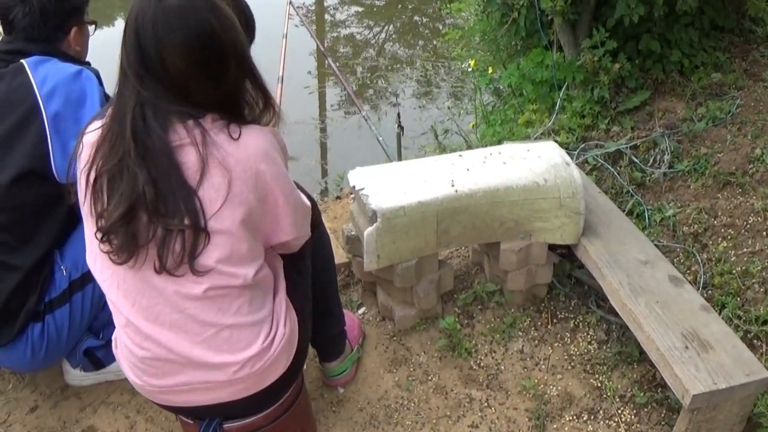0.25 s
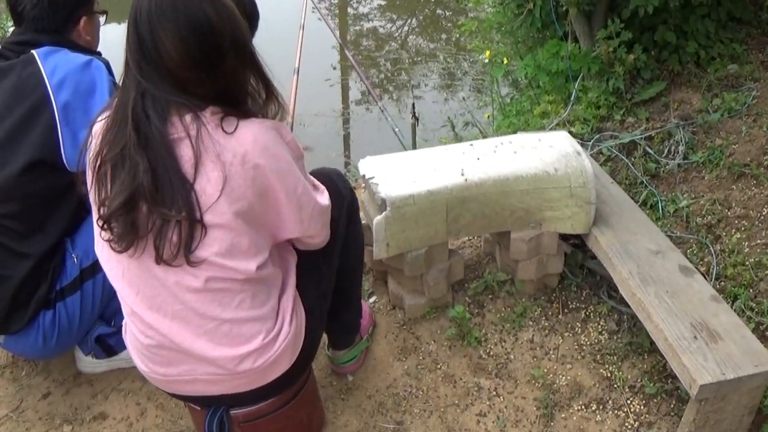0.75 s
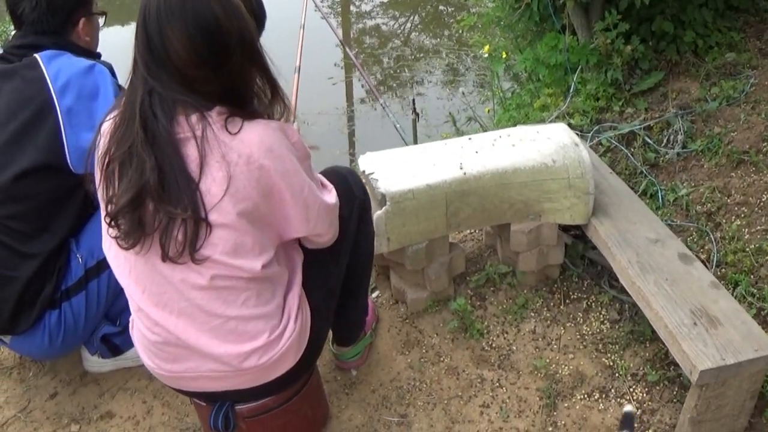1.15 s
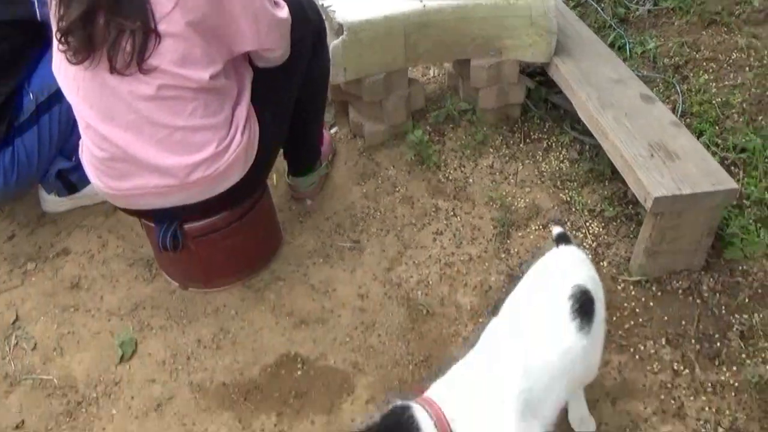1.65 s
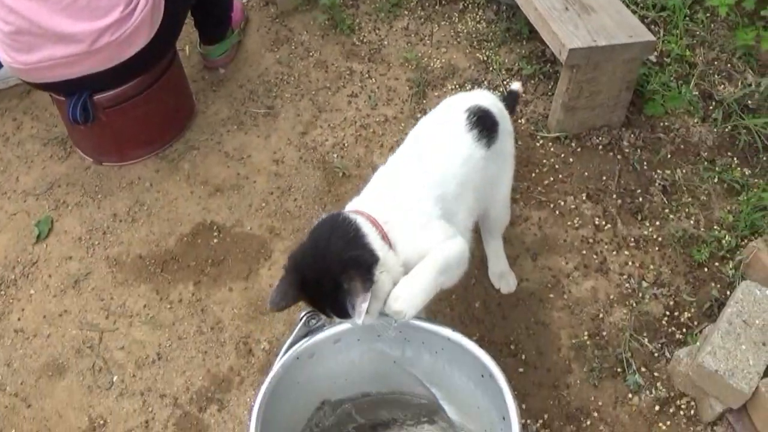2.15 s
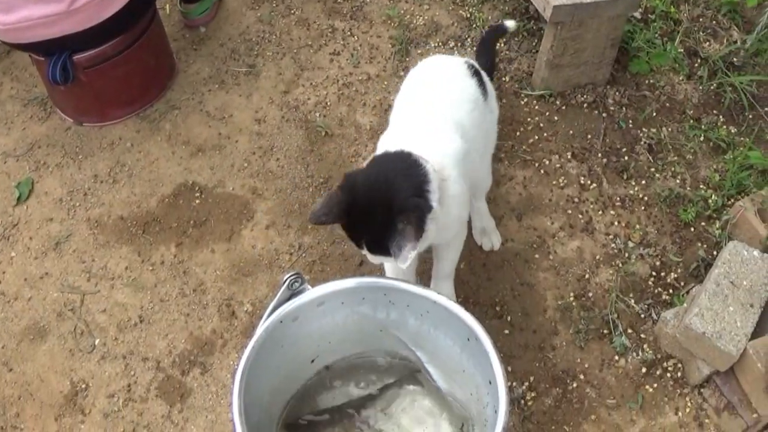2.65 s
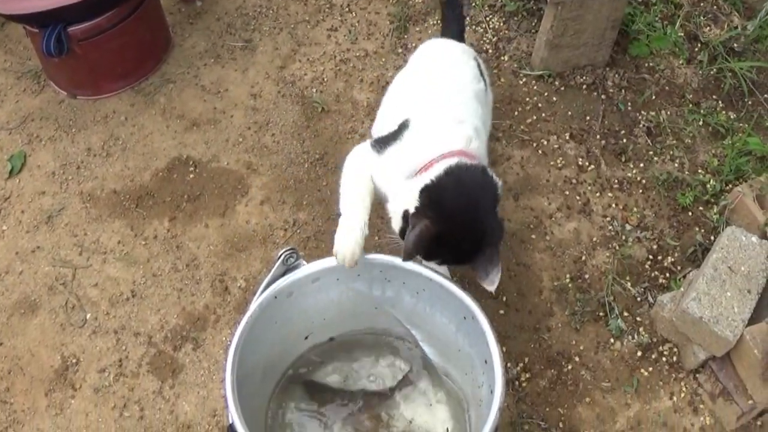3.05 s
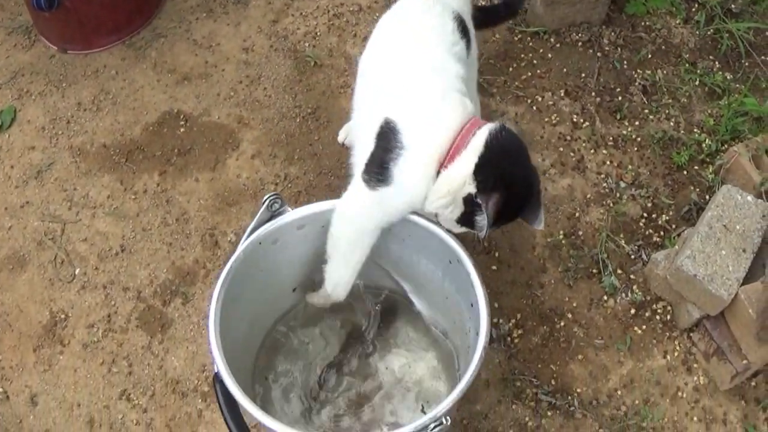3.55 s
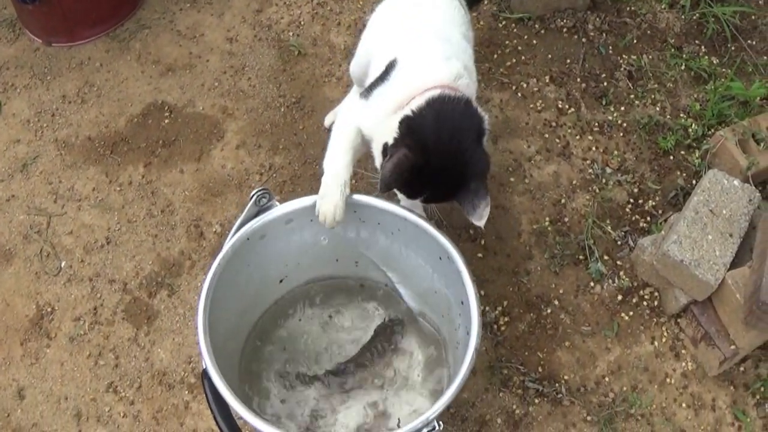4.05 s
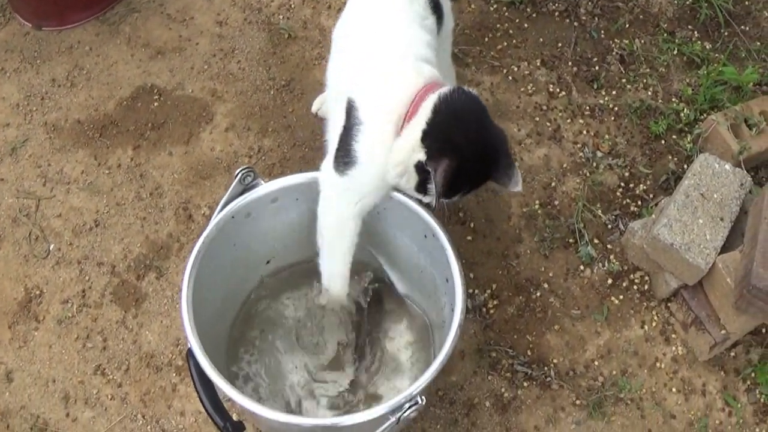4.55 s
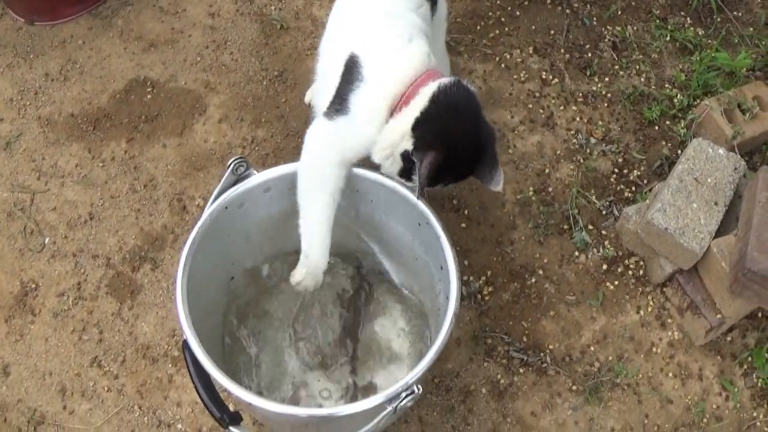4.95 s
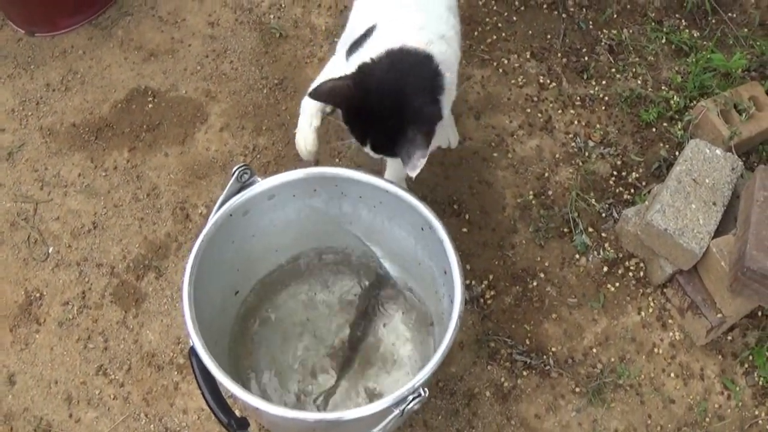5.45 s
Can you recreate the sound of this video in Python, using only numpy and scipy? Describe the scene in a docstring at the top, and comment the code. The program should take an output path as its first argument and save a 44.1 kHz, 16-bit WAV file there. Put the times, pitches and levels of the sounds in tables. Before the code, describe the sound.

Quiet country air with a faint distant drone and fine, fast insect-like ticking runs throughout, wide and soft. Faint gliding bird whistles come at 0.1, 0.4 and 0.95 s. Close up, slightly right at first, sharp drops snap in a metal bucket from 0.1 s; short splashes and fizz follow at 0.7-0.9 s. From 1.2 to 1.7 s the water churns harder, with gulping bubbles, spray and a wet metallic knock at 1.4 s. High wavering pips around 1.5-2.1 s fade away. It is nearly still until two soft piping bird notes at 3.2 and 3.4 s. Paw swishes lead to a knock and splashing at 3.5-3.8 s, then settling fizz and a few drips. A soft swish at 4.6 s precedes a very loud, sharp tick at 4.83 s and a dense splash with bubbles and metal ring around 4.95-5.15 s. Scattered drops die away by 5.7 s, with short, tight bucket echoes.

```python
"""Quiet country air with a faint far drone and fine, fast ticking opens the scene, with faint bird whistles.
A cat paws at a fish in a metal bucket of shallow water: drops, splashes, gulping bubbles, knocks, high pips.
Shaped noise makes air, spray, swishes and wash; short gliding tones make bubbles, birds and pips.
Drops mix a noisy crack with a ping. Resonances make the metal ring, and echoes close the bucket round it."""
import sys
import numpy as np
from scipy import signal
from scipy.io import wavfile

SR = 44100
rng = np.random.default_rng(int(sys.argv[2]) if len(sys.argv) > 2 else 0)


def to_wav(sig):
    """Store sig (one row per channel, or 1-D mono) as 16-bit WAV at the path in sys.argv[1].

    Samples outside -1..1 are clipped; the rate is SR.
    """
    pcm = np.clip(np.atleast_2d(sig), -1, 1) * 32767
    pcm = np.round(pcm).astype(np.int16)
    wavfile.write(sys.argv[1], SR, pcm.T)  # frames by channels


N = 251811
TIME = np.arange(N) / SR
AGE = TIME[:SR // 4]   # seconds since an event began

# Colour of the outdoor air. Each row: pitch in Hz, relative level in dB per Hz.
AIR_COLOUR = [(30, -15), (200, -6), (800, -0.5), (1450, -4), (4200, -10), (5500, -13), (10000, -14),
              (16000, -24.5)]
# A distant drone. Each row: centre in Hz, width in Hz, level in dB.
DRONES = [(464.5, 25.6, -67.5)]
# How alike the air is in the two ears. Each row: pitch in Hz, likeness from 0 to 1.
EAR_LIKENESS = [(200, 0.98), (1300, 0.47), (4000, 0.28), (10000, 1)]
# Bouts of stirring in the bucket. Each row: start in seconds, end in seconds, slosh level in dB, fizz level in dB.
STIRRING_BOUTS = [(0.68, 0.93, -59, -54.5), (1.23, 1.374, -57, -53), (1.421, 1.682, -50, -52),
                  (3.55, 3.792, -48.5, -49.5), (4.931, 5.137, -47.5, -48.5), (5.403, 5.471, -55, -66)]
# Blows on the bucket wall. Each row: time in seconds, level in dB, pitch the contact excites most in Hz.
WALL_KNOCKS = [(1.432, -28.5, 6730), (3.4878, -24.5, 5700), (4.951, -29.5, 4400)]
# Pitches at which the bucket wall rings, in close clusters. Each entry: pitch in Hz.
WALL_MODES = [1127, 1238, 1610, 2290, 3500, 4250, 4430, 4670, 4760, 4660, 5110, 5820, 6116, 6250, 6680,
              7200]
# Bird whistles. Each row: start in seconds, length in seconds, start pitch in Hz, end pitch in Hz, level in dB.
BIRD_WHISTLES = [(0.065, 0.055, 1860, 2360, -54), (0.365, 0.11, 2980, 2110, -53),
                 (0.949, 0.125, 3060, 2090, -56)]
# The loudest drops and sharp ticks. Each row: time in seconds, level in dB, centre in Hz,
# time to die away by 60 dB in seconds.
LOUD_DROPS = [(0.1142, -20.5, 7360, 0.013), (0.13, -31.5, 1920, 0.0043), (0.425, -35.5, 7500, 0.033),
              (0.5305, -26.5, 7200, 0.016), (0.555, -29, 4860, 0.024), (0.6265, -15.5, 8760, 0.003),
              (0.6595, -22, 11800, 0.0048), (0.7668, -26.5, 8640, 0.0089), (0.789, -32, 4700, 0.027),
              (0.826, -26.5, 7600, 0.003), (0.894, -23, 1030, 0.023), (1.1345, -21.5, 9900, 0.023),
              (1.148, -25, 1590, 0.015), (1.2742, -34, 9500, 0.0015), (1.291, -23.5, 4970, 0.037),
              (1.2965, -23.5, 6740, 0.007), (1.317, -29, 10800, 0.009), (1.3668, -32, 3500, 0.017),
              (1.4076, -25.5, 6260, .006), (1.4232, -26, 5000, 0.0054), (1.523, -21.5, 3960, 0.0086),
              (1.56, -21.5, 4100, 0.015), (1.6805, -24.5, 7640, 0.024), (1.7884, -26, 7300, 0.014),
              (1.795, -24, 9350, 0.015), (2.6664, -35, 9290, 0.0052), (3.0852, -40, 9300, 0.092),
              (4.057, -28, 6060, 0.0085), (4.3298, -32, 12300, 0.0046), (4.376, -26, 11100, 0.0057),
              (4.578, -32, 2520, 0.013), (4.7681, -23, 8500, 0.021), (4.813, -26.5, 3040, 0.014),
              (4.823, -24, 4360, 0.019), (4.8274, -5.5, 5940, 0.0023), (4.829, -17.5, 9500, 0.0087),
              (4.9207, -23, 9800, 0.014), (5.0845, -23.5, 10970, 0.0061), (5.1485, -24, 5000, 0.0057),
              (5.303, -30.5, 7400, 0.0063), (5.3542, -23.5, 6640, 0.004), (5.684, -39, 7400, 0.049)]
# Big pockets of trapped air. Each row: time in seconds, level in dB, starting pitch in Hz,
# starting rise in e-folds per second (a minus sign means falling).
BIG_BUBBLES = [(0.6078, -32.5, 2370, -20), (0.959, -25, 1484, 9.5), (1.345, -31.5, 2180, 12),
               (1.416, -35.5, 1280, 19.5), (1.429, -23, 2870, 25), (1.447, -34, 2290, -19),
               (1.459, -43, 1050, 16), (1.4966, -25, 1316, 30), (1.549, -38, 514, 11),
               (1.59, -29, 1280, 22.5), (1.683, -32.5, 1049, 13.5), (3.592, -37, 3370, 18),
               (3.709, -32, 2840, 18), (3.759, -40.5, 1200, 7), (3.796, -36, 2190, 12),
               (3.799, -36, 1014, 13), (4.3079, -39.5, 1587, -8), (4.334, -48, 1530, 10),
               (4.797, -45.5, 704, 3), (4.927, -33, 927, 6), (4.952, -33, 1480, 8), (4.977, -26, 3870, 10),
               (5.116, -32.5, 1756, 5), (5.1365, -24.5, 3370, -20), (5.16, -33.5, 1380, 25),
               (5.178, -37, 2440, -13), (5.261, -35.5, 1826, 2)]
# Sheets of water thrown up. Each row: time in seconds, level in dB before depth acts,
# depth of the stroke from 0 to 1, time to die away by 60 dB in seconds.
WATER_SHEETS = [(0.698, -53.5, 1, 0.08), (0.869, -46, 1, 0.084), (0.883, -33.5, 0.96, 0.021),
                (0.903, -30.5, 0.95, 0.012), (1.428, -23.5, 0, 0.028), (1.679, -22.5, 0.73, 0.014),
                (3.465, -28.5, 0, 0.062), (3.486, -30.5, 0.61, 0.15), (3.5768, -28.5, 0, 0.11),
                (3.646, -27, 0, 0.08), (3.678, -37, 0.2, 0.11), (3.704, -38, 0.81, 0.08),
                (3.742, -22, 0.1, 0.019), (4.857, -30.5, 0.26, 0.088), (4.9267, -32.5, 0.93, 0.028),
                (4.938, -25, 0.81, 0.047), (4.952, -24.5, 0.77, 0.033), (4.978, -39, 0.85, 0.097),
                (5.006, -44, 1, 0.04), (5.128, -33.5, 0.63, 0.09)]
# Soft swishes of the paw. Each row: middle in seconds, level in dB, half length in seconds.
PAW_SWISHES = [(1.345, -46, 0.015), (3.33, -55, .03), (3.367, -43, 0.013), (3.461, -47, 0.056),
               (4.626, -53, 0.12), (4.781, -46.5, 0.018)]
# A run of high pips. Each entry: time in seconds.
PIP_TIMES = [1.481, 1.6184, 1.712, 1.729, 1.774, 1.8176, 1.875, 1.8996, 1.925, 1.948, 1.969, 2.101]
# A lower bird's piping notes. Each row: start in seconds, held pitch in Hz, level in dB.
PIPED_NOTES = [(3.21, 1330, -49.5), (3.393, 1550, -51.5)]

AIR_DB = -58.5
BUILD_S, SLOSH_SETTLE_S, FIZZ_SETTLE_S = .17, .11, .34   # foam outlasts the waves
SLOSH_REST_DB, FIZZ_REST_DB = -70, -65.5   # level between bouts
STRAY_DB, STRAY_SPREAD_DB = 9.5, 12   # the smallest stray drop over the fizz; how much more the biggest has
STRAY_LOW_HZ, STRAY_HIGH_HZ, STRAY_T60_S = 2950, 11300, 0.005
SPRAY_HZ, SPRAY_DB_PER_DEPTH = 5000, 2.5   # a deep stroke throws a little more spray
SLAP_DB, SLAP_DB_PER_DEPTH = -15, 17.5   # and slaps much harder
PLUNGE_DB, PLUNGE_DB_PER_CUBED_DEPTH = -29.5, 39.5   # the cavity is strong only in the deepest
PIP_DB, PIP_FADE_DB_PER_S = -18, 50.5   # the second is loudest; loss with time away from it
CUTOFF_HZ = 16000


def from_db(db):
    """Turn decibels into a plain multiplier."""
    return 10 ** (np.asarray(db) / 20)


def rms_one(x):
    """Scale a sound to an average strength (rms) of 1."""
    return x / np.sqrt(np.mean(x ** 2) + 1e-20)


def at_hz(points, hz):
    """Read a spectrum on a log-frequency axis."""
    table = np.array(points)
    return np.interp(np.log(hz), np.log(table[:, 0]), table[:, 1])


def add(out, s, sound):
    """Mix a sound in at time s."""
    start = max(int(s * SR), 0)
    out[..., start:start + sound.shape[-1]] += sound[..., :max(N - start, 0)]


def band(x, low_hz, high_hz):
    """Keep a band of pitches, with 12 dB per octave skirts."""
    edges = [low_hz, min(high_hz, .45 * SR)]
    return signal.sosfilt(signal.butter(2, edges, "band", fs=SR, output="sos"), x)


def resonate(x, hz, width_hz):
    """One resonance, gain about 1 on top."""
    r = np.exp(-np.pi * width_hz / SR)
    top = np.array([1, 0, -1]) * (1 - r * r) / 2
    return signal.lfilter(top, [1, -2 * r * np.cos(2 * np.pi * hz / SR), r * r], x)


def tone(pitch):
    """A sine that follows a moving pitch in Hz."""
    return np.sin(2 * np.pi * np.cumsum(pitch) / SR)


def dying(t60, attack):
    """Envelope of a blow: quick rise, then a steady fall of 60 dB in t60 seconds."""
    return (1 - np.exp(-AGE / attack)) * np.exp(-np.log(1000) * AGE / t60)


def shaped(x, envelope):
    """Lay an envelope on a sound, which takes on the envelope's energy."""
    return rms_one(x * envelope) * np.sqrt(np.mean(envelope ** 2))


def drift(rate, size=N):
    """Random wander with spread near 1, through rate new values a second."""
    return np.interp(TIME[:size] * rate, np.arange(N // 8), rng.standard_normal(N // 8))


def banded_noise(spectrum, patchy_db, patchy_rate):
    """Half-octave bands of stereo noise, each flickering by itself; rms 1."""
    out, edges = 0, 22 * 2 ** np.arange(0, 10, .5)
    white = rng.standard_normal((2, 2, N))
    for k, (low, high) in enumerate(zip(edges, edges[1:])):
        hz = np.sqrt(low * high)
        if hz < spectrum[0][0]:
            continue
        mid, side = band(white[k % 2], low, high)
        alike = np.clip(at_hz(EAR_LIKENESS, hz), 0, 1)
        gain = from_db(at_hz(spectrum, hz) + patchy_db * drift(patchy_rate))
        out = out + gain * (np.sqrt(1 + alike) * mid + np.sqrt(1 - alike) * side * [[1], [-1]])
    return rms_one(out)


def country():
    """Still outdoor air is soft noise; a far drone is noise through a narrow resonance."""
    drone = 0
    for hz, width, db in DRONES:
        drone = drone + from_db(db) * rms_one(resonate(rng.standard_normal(N), hz, width))
    air = banded_noise(AIR_COLOUR, patchy_db=.5, patchy_rate=6)
    return from_db(AIR_DB) * air + drone


def ticking(hz=2780, upper_hz=3400, db=-55.5, upper_db=-60, width=0.002,
            rise_hz_per_s=80000, fall_hz_per_s=170000, uneven_db=2):
    """About thirty uneven ticks a second: a falling chirp, weaker every other time, runs into a rising one."""
    ticks_per_s = 29.97
    cycle = (TIME - .025) * ticks_per_s
    age = (cycle - np.round(cycle)) / ticks_per_s
    odd, early = np.round(cycle) % 2, age + width   # the falling chirp peaks first
    rising = np.sin(2 * np.pi * (hz + rise_hz_per_s * age / 2) * age)
    rising = from_db(db) * rising * np.exp(-(age / width) ** 2 / 2)
    falling = np.sin(2 * np.pi * (upper_hz - fall_hz_per_s * early / 2) * early)
    falling = from_db(upper_db) * (1 - odd / 2) * falling * np.exp(-(early / width) ** 2 / 2)
    return (rising + falling) * from_db(uneven_db * drift(27.27))


def stirred(bout_db, settle_s, rest_db):
    """Motion of the water: each bout builds up, holds and settles with a long tail."""
    motion = np.full(N, from_db(rest_db))
    for (start, end, *_), db in zip(STIRRING_BOUTS, bout_db):
        away = np.maximum(start - TIME, 0) / BUILD_S + np.maximum(TIME - end, 0) / settle_s
        motion = np.maximum(motion, from_db(db) / (1 + away) ** 2)
    return motion


def water_motion():
    """Strength of the slosh and of the fizz."""
    _, _, slosh_db, fizz_db = np.transpose(STIRRING_BOUTS)
    slosh = stirred(slosh_db, SLOSH_SETTLE_S, SLOSH_REST_DB)
    return slosh, stirred(fizz_db, FIZZ_SETTLE_S, FIZZ_REST_DB)


def grains(per_s, low_hz, high_hz, cycles, spread_db, count=20):
    """Countless small bubbles of random size and pitch, each a click that sets off a resonance; rms 1."""
    born = rng.random(N) < per_s / SR
    sizes = from_db(spread_db * np.minimum(rng.exponential(1, N), 3.5))
    clicks = born * sizes * rng.choice([-1, 1], N)
    dealt = rng.integers(0, count, N)   # which pitch each click gets
    out = 0
    for k, hz in enumerate(np.geomspace(low_hz, high_hz, count)):
        out = out + resonate(clicks * (dealt == k) + 1e-18, hz, 2 * hz / cycles) / np.sqrt(hz)
    return rms_one(out)


def bubble(hz, rise, cycles, attack=0.000067):
    """A bubble rings for so many cycles (fewer below 800 Hz), its pitch gliding as it nears the surface."""
    t60 = cycles / max(hz, 800)
    pitch = hz * np.exp(rise * t60 / 2 * np.tanh(2 * AGE / t60))
    return tone(pitch) * dying(t60, attack)


def gurgle(stir, low_hz=1400, high_hz=6500, cycles=36, rise=9, spread_db=3.0, count=1500):
    """Small bubbles break loose, more of them and louder the harder the water is stirred."""
    out, busy = np.zeros(N), np.cumsum(stir)
    for when, pitch, size, glide in rng.random((count, 4)):
        at = np.searchsorted(busy, when * busy[-1])
        level = stir[at] * from_db(spread_db * min(-np.log(size), 3))
        hz = low_hz * (high_hz / low_hz) ** pitch
        add(out, at / SR, level * bubble(hz, 2 * rise * glide, cycles))
    return out


def swilling(slosh, fizz, lumpy_db=3, churn_db=-7, wash_db=-8, hiss_db=-5, foam_db=-7,
             gurgle_db=-3, fizz_share=.35):
    """Stirred water: a low churn, an uneven wash, bubbles, and hiss and bursting foam on top."""
    noise = rng.standard_normal((2, N))
    lumps = rms_one(from_db(lumpy_db * drift(130)))
    churn = from_db(churn_db) * grains(per_s=400, low_hz=306, high_hz=984, cycles=6.6, spread_db=3)
    wash = from_db(wash_db) * rms_one(band(noise[0], 1770, 4800)) * lumps
    hiss = from_db(hiss_db) * rms_one(band(noise[1], 3860, 12800)) * lumps
    foam = from_db(foam_db) * grains(per_s=500, low_hz=3300, high_hz=13500, cycles=20, spread_db=4)
    small_bubbles = from_db(gurgle_db) * gurgle(slosh + fizz_share * fizz)
    return slosh * (churn + wash) + small_bubbles + fizz * (hiss + foam)


def wall(water, drive_db=-47, top_t60=0.047, contact_s=0.003):
    """Metal rings under soft, wet knocks and, faintly, the water's noise; low modes are weaker and last longer."""
    out = 0
    for k, hz in enumerate(WALL_MODES):
        force = from_db(drive_db) * water + 1e-18
        radiation = hz / np.hypot(hz, 2200)
        for s, knock_db, contact_hz in WALL_KNOCKS:
            mismatch = min(abs(np.log2(hz / contact_hz)) * 5, 4)
            add(force, s + contact_s * rng.random(), from_db([knock_db]) / np.hypot(1, mismatch))
        w = 2 * np.pi * hz / SR
        r = np.exp(-np.log(1000) * np.sqrt(hz / WALL_MODES[-1]) / (top_t60 * SR))
        ring = signal.lfilter([.5, 0, -.5], [1, -2 * r * np.cos(w), r * r], force)
        out = out + (-1) ** k * radiation * ring
    return out


def stray_drops(fizz, count=250):
    """Random droplets falling back, most of them tiny, crowded where the water foams; rows as in LOUD_DROPS."""
    when, size, pitch = rng.random((count, 3)).T
    times = np.interp(when, np.cumsum(fizz) / np.sum(fizz), TIME)
    levels = 20 * np.log10(np.interp(times, TIME, fizz)) + STRAY_DB + STRAY_SPREAD_DB * size ** 2
    pitches = STRAY_LOW_HZ * (STRAY_HIGH_HZ / STRAY_LOW_HZ) ** pitch
    return [(s, db, hz, STRAY_T60_S) for s, db, hz in zip(times, levels, pitches)]


def birds(waver_db=4.5):
    """Faint pure glides that swell, waver and fade."""
    out = np.zeros(N)
    for s, length, start_hz, end_hz, db in BIRD_WHISTLES:
        along = np.minimum(AGE / length, 1)
        glide = (along + np.sin(np.pi * along / 2) ** 2) / 2
        swell = np.sqrt(np.abs(np.sin(np.pi * along)))
        add(out, s, from_db(db) * swell * tone(start_hz * (end_hz / start_hz) ** glide))
    return out * from_db(waver_db * drift(80.1))


def drops(rows, crack_db=-5, ping_db=-2, ping_t60=0.0062):
    """Each impact is a resonant crack around a quickly damped ping."""
    out = np.zeros(N)
    for s, db, hz, t60 in rows:
        noise = resonate(resonate(rng.standard_normal(len(AGE)), hz, hz), hz, 2 * hz)
        crack = shaped(noise, dying(t60, attack=2 / SR))
        ping = np.sin(2 * np.pi * hz * AGE) * dying(min(t60, ping_t60), attack=2 / SR)
        add(out, s, from_db(db) * (from_db(crack_db) * crack + from_db(ping_db) * ping))
    return out


def bubbles(cycles=76):
    """The big single gulps and bloops: ringing pockets of air."""
    out = np.zeros(N)
    for s, db, hz, rise in BIG_BUBBLES:
        add(out, s, from_db(db) * bubble(hz, rise, cycles))
    return out


def froth(low_hz, high_hz, cycles, count):
    """A swarm of short bubbles or droplets set off by a splash; rms 1."""
    out = np.zeros(N)
    for when, pitch, size in rng.random((count, 3)):
        hz = low_hz * (high_hz / low_hz) ** pitch
        turns = hz * AGE[:int(SR * cycles / hz)]
        ring = np.sin(2 * np.pi * turns) * np.exp(-np.log(1000) * turns / cycles)
        add(out, when * AGE[-1], (2 * size - 1) * np.sqrt(hz) * ring)
    return rms_one(out[:len(AGE)])


def splashes(lumpy_db=4, lump_rate=600, spray_ratio=1.7, mist_db=-4, film_db=-6):
    """The cavity gurgles, the surface slaps and spray tears off in lumps; stroke depth sets their shares."""
    out = np.zeros(N)
    for s, db, depth, t60 in WATER_SHEETS:
        noise = rng.standard_normal((4, len(AGE)))
        envelope = dying(t60, attack=.001)
        lumps = from_db(lumpy_db * drift(lump_rate, len(AGE)))
        cavity = froth(low_hz=291, high_hz=1380, cycles=13.5, count=200)
        slap = rms_one(band(noise[1], 1050, 3700)) / 2
        slap = slap + froth(low_hz=1037, high_hz=4190, cycles=13, count=300)
        low_hz, high_hz = SPRAY_HZ / spray_ratio, SPRAY_HZ * spray_ratio
        smooth = rms_one(band(noise[2], low_hz, high_hz)) / 2
        jet = rms_one(smooth + froth(low_hz, high_hz, cycles=17.6, count=500))   # mostly separate droplets
        jet += from_db(mist_db) * rms_one(band(noise[3], 7600, 12100))
        film_hz = SPRAY_HZ * 2 ** (rng.random() - .5)   # a cloud of like-sized bubbles, another size each time
        jet += from_db(film_db) * rms_one(resonate(noise[0], film_hz, film_hz / 10))
        parts = [(PLUNGE_DB + PLUNGE_DB_PER_CUBED_DEPTH * depth ** 3, cavity),
                 (SLAP_DB + SLAP_DB_PER_DEPTH * depth, slap),
                 (SPRAY_DB_PER_DEPTH * depth, jet)]
        for part_db, part in parts:
            add(out, s, from_db(db + part_db) * shaped(part * lumps, envelope))
    return out


def swishes(low_hz=3300, high_hz=11500):
    """The paw brushes along: a smooth hiss that swells and fades."""
    swell = sum(from_db(db) * np.exp(-((TIME - s) / half) ** 2) for s, db, half in PAW_SWISHES)
    return swell * rms_one(band(rng.standard_normal(N), low_hz, high_hz))


def pips(hz=4190, t60=0.016, attack=0.00099, waver=0.026):
    """Short wavering tones, all near one pitch, in an uneven run that fades after the second."""
    out = np.zeros(N)
    for s in PIP_TIMES:
        db = PIP_DB - PIP_FADE_DB_PER_S * abs(s - PIP_TIMES[1])
        pitch = hz * (1 + waver * drift(2000, len(AGE)))
        add(out, s, from_db(db) * tone(pitch) * dying(t60, attack))
    return out


def piping(overshoot=0.197, settle_s=0.0124, t60=0.59, attack=0.0035):
    """Each note starts sharp, drops onto its pitch and fades."""
    out = np.zeros(N)
    for s, hz, db in PIPED_NOTES:
        pitch = hz * (1 + overshoot * np.exp(-AGE / settle_s))
        add(out, s, from_db(db) * tone(pitch) * dying(t60, attack))
    return out


def bucket(x, t60=0.07, wet_db=-11, side_db=-12, side_lag=0.000903, tail_t60=0.29, tail_db=-22):
    """Sound bounces inside the bucket; one echo comes from the side, and a faint tail from the surroundings."""
    noise = band(rng.standard_normal((3, len(AGE))), 180, 7500)
    tail = dying(tail_t60, attack=0.0029)
    echoes = noise * [dying(t60, attack=0.00034), tail, tail]   # bucket, then the tail for left and right
    echoes /= np.sqrt(np.sum(echoes ** 2, axis=1, keepdims=True))
    wet = signal.fftconvolve(x[None], echoes, axes=1)[:, :N]
    side = from_db(side_db) * band(np.interp(TIME - side_lag, TIME, x), 1800, 7500)
    return x + from_db(wet_db) * wet[0] + from_db(tail_db) * wet[1:] + side * [[1], [-1]]


def scene(dip_hz=660, dip_share=0.41):
    """Water and metal sound from the bucket, which is too small to radiate bass; the country lies behind."""
    slosh, fizz = water_motion()
    water = splashes() + swilling(slosh, fizz) + swishes()
    water = water - dip_share * resonate(water, dip_hz, dip_hz / 2)   # hollow in the low middle
    inside = water + drops(LOUD_DROPS + stray_drops(fizz)) + bubbles() + pips() + wall(water)
    inside = band(inside, 310, SR / 2)
    lean_db = np.interp(TIME, [1.8, 2.4], [-1.1, 0])   # starts a little to the right, then moves to the middle
    placed = bucket(inside) * from_db(lean_db * np.array([[.5], [-.5]]))
    return placed + birds() + piping() + ticking() + country()


def record(dry):
    """The top is cut steeply."""
    return signal.sosfilt(signal.ellip(10, .2, 80, CUTOFF_HZ, fs=SR, output="sos"), dry)


dry = scene()
out = record(dry)
to_wav(out)
```